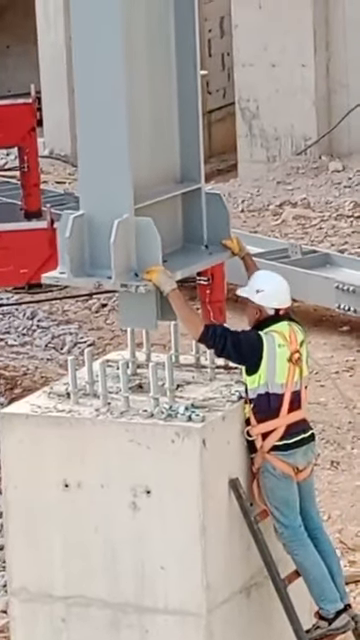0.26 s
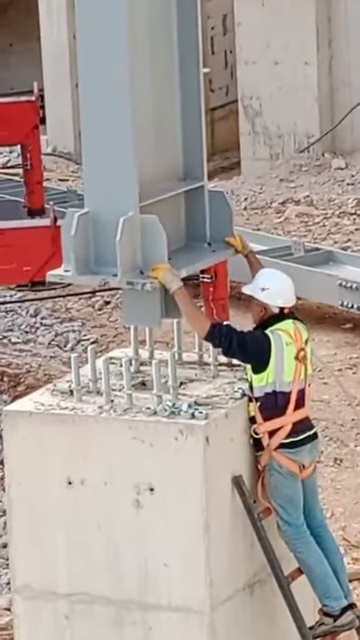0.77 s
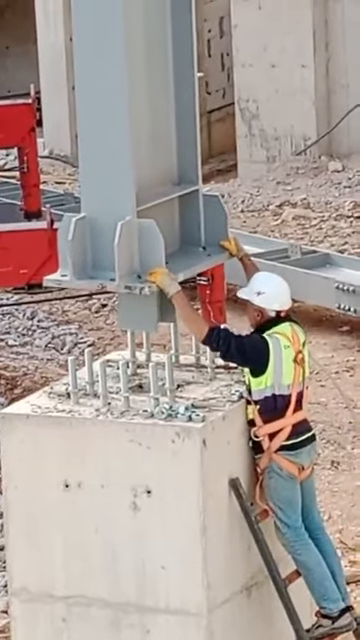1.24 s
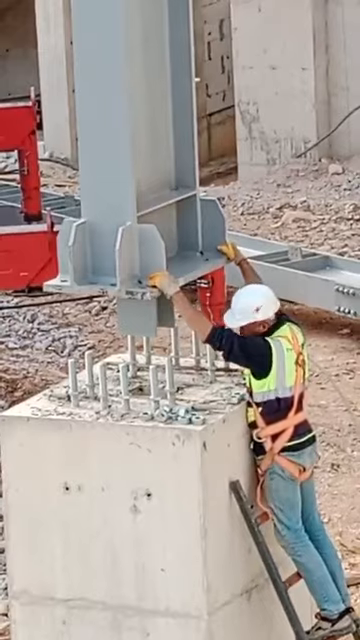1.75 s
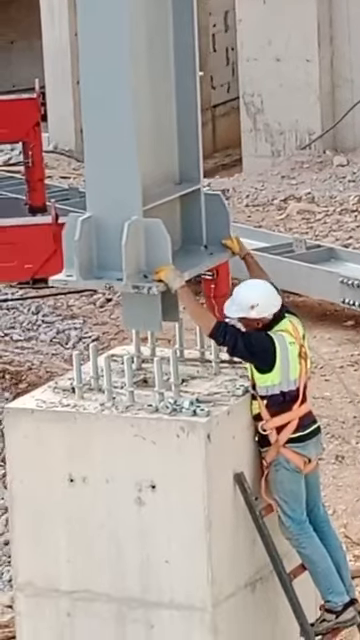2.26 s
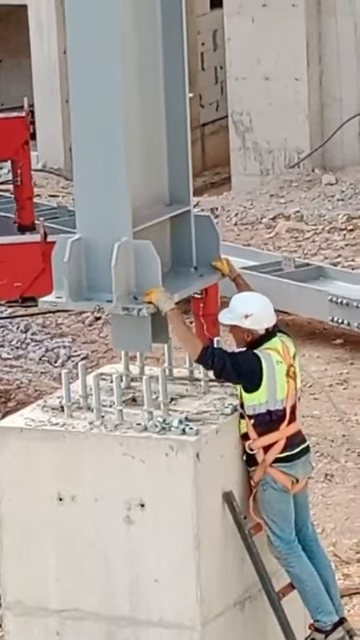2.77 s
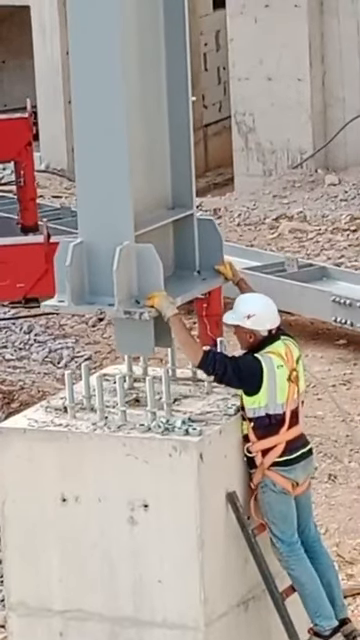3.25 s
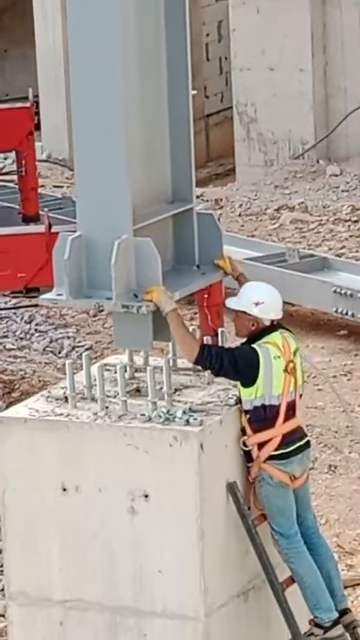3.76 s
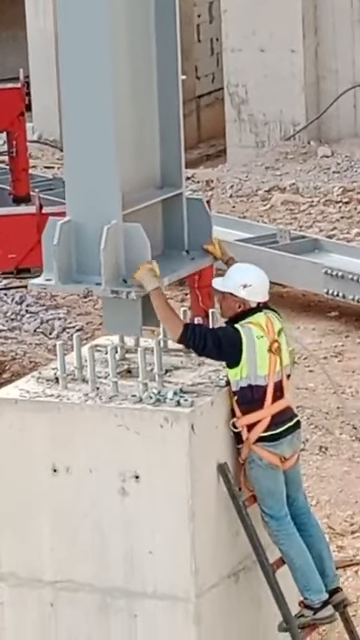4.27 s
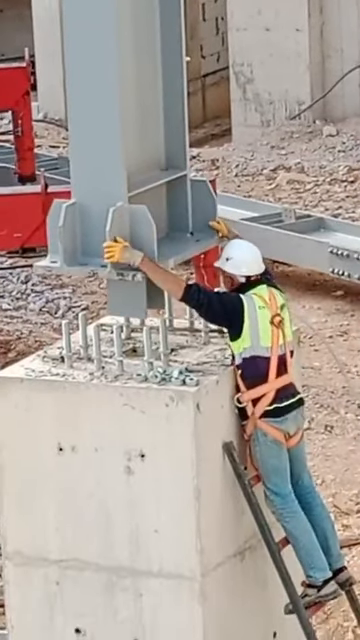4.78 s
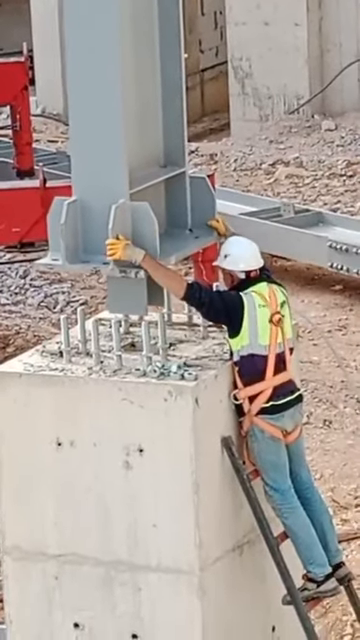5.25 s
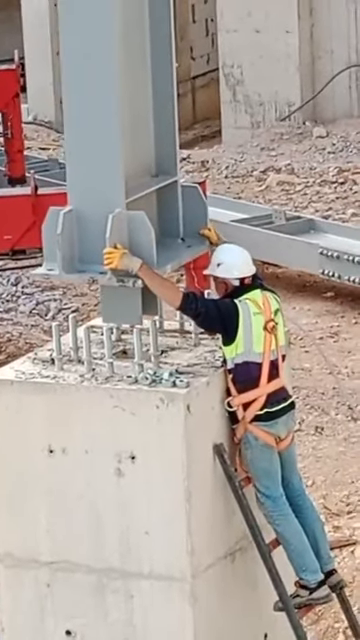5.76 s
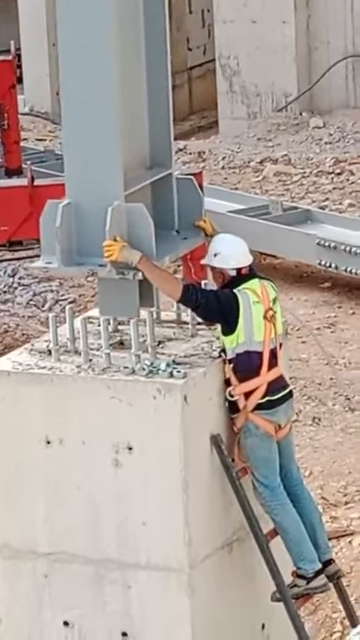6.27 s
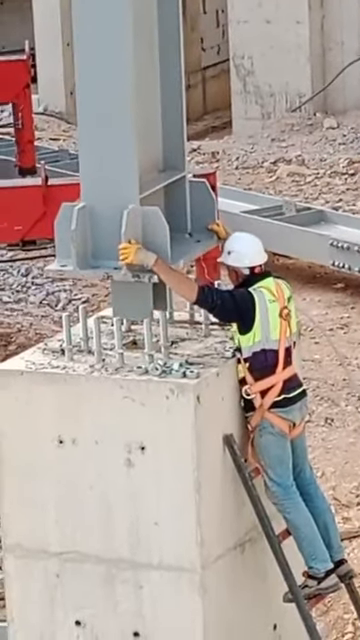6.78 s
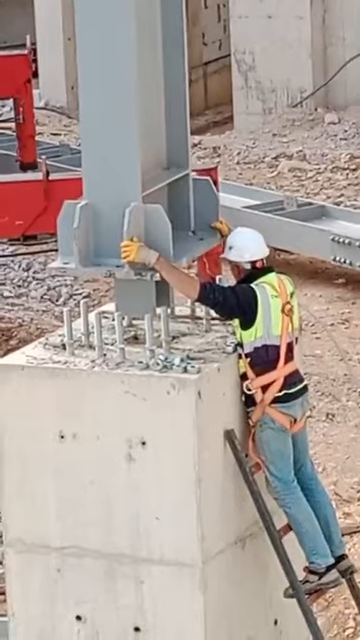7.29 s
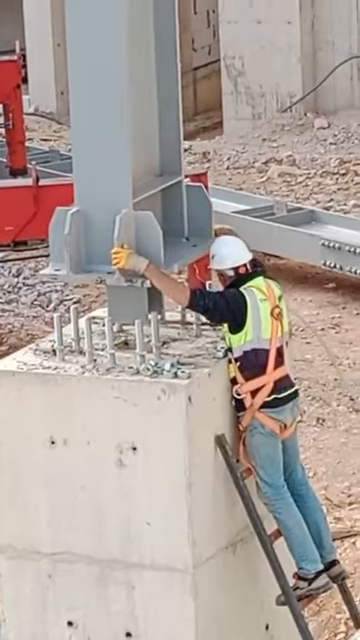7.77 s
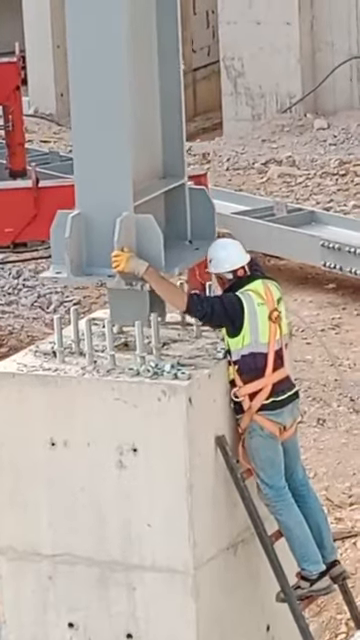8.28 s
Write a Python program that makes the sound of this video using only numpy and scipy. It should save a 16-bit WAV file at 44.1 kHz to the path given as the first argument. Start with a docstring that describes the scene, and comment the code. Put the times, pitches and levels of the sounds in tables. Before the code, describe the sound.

A heavy diesel engine on a building site slows to a clattering idle. Steel scrapes briefly and knocks dully, with one sharp metallic clack. A valve lets off a short hiss of air, then the engine revs up under load, louder and booming, and eases near the end. Concrete walls throw the clatter back, and wind gusts buffet the microphone.

```python
"""Crane diesel setting down a steel column.

The six-cylinder engine slows to idle, a valve lets off air, then it revs up under load and eases.
Firings slap the block and boom in the exhaust pipe; concrete walls throw the clatter back.
Steel knocks, rattles and scrapes, with one sharp clack. Gusts buffet the microphone."""
import sys
import numpy as np
from scipy import signal
from scipy.fft import rfft, irfft
from scipy.io import wavfile

SR = 44100
rng = np.random.default_rng(int(sys.argv[2]) if len(sys.argv) > 2 else 0)


def digitize_waveform(pressure):
    """Quantize a signal to 16-bit integers and store it at the path in sys.argv[1].

    Rows of a 2-D input are taken as channels; values are limited to [-1, 1].
    """
    field = np.atleast_2d(pressure).T
    bounded = np.clip(field, -1, 1)
    quanta = np.round(bounded * 32767).astype(np.int16)
    wavfile.write(sys.argv[1], SR, quanta)


N = 376155
T, HZ = np.arange(N) / SR, np.fft.rfftfreq(N, 1 / SR)

# t/s, firing rate/Hz
FIRING_RATE = [(0, 73), (.1, 70), (.2, 59.5), (.33, 56), (.6, 52), (1.4, 36), (2.0, 29), (2.9, 34.2),
               (3.6, 32.6), (4.15, 38.5), (4.39, 54.5), (4.6, 65), (4.83, 68), (5.5, 64.7), (5.87, 59.3),
               (6.35, 56.5), (7.1, 60.2), (7.6, 58.3), (8.05, 52.5), (8.53, 44)]
# t/s, load/0-1
ENGINE_LOAD = [(1.6, 0), (2.0, .45), (2.7, .47), (3.05, .24), (3.2, .45), (3.7, .47), (4.05, 1), (4.8, 1),
               (5.5, .85), (6.25, .7), (6.7, .92), (7.05, .62), (7.3, .54), (7.6, .68), (8.04, .73),
               (8.14, .45), (8.53, .3)]
CYLINDERS = 6


def diesel(jitter=.002):
    """One crankshaft drives block and exhaust; the clatter echoes off the walls."""
    firings = np.cumsum(curve(FIRING_RATE) * (1 + jitter * drift(8))) / SR
    clatter = colour(walls(block(firings)), TREBLE_CUT)
    return clatter + exhaust_tones(firings) + exhaust_drone(firings) + exhaust_boom(firings)


def speed_octaves(ref_hz=60):
    """Firing rate in octaves above ref_hz."""
    return np.log2(curve(FIRING_RATE) / ref_hz)


def effort_db(base_db=-26.5, db_per_octave=10, db_per_load=12):
    """The engine gets louder with speed and load."""
    return base_db + db_per_octave * speed_octaves() + db_per_load * (curve(ENGINE_LOAD) - 1)


def vibration(firings, roughness, size=4096):
    """Shaking that repeats with each round of the cylinders, blended with noise."""
    pattern = irfft(np.exp(2j * np.pi * rng.random(size // 8)), size)
    repeating = np.interp(firings / CYLINDERS % 1, np.arange(size) / size, pattern, period=1)
    return np.sqrt(1 - roughness) * unit(repeating) + 2 * np.sqrt(roughness) * noise()


# clatter under load: f/Hz, level/dB
LOADED_SPECTRUM = [(300, -22.5), (430, -19.5), (475, -27.5), (540, -28.5), (600, -8.5), (760, -2.5),
                   (818, 0), (960, -1), (1050, 1.5), (1160, -0.5), (1290, 3), (1370, -3), (1490, -15.5),
                   (1650, -9), (1760, -22), (2000, -28), (2400, -12.5), (2880, -17), (3300, -28.5),
                   (4400, -24.5), (5800, -31.5), (8000, -40.5)]
# looser, hissier clatter, running throughout on its own level curve: f/Hz, level/dB
LOOSE_SPECTRUM = [(260, -24.5), (410, -11.5), (480, -19), (550, -10.5), (650, -11), (869, -1.5), (1120, -1),
                  (1460, -7), (1630, -6), (2170, -15), (2890, -13), (4710, -27.5), (5350, -25.5),
                  (5700, -30.5), (7410, -73), (12500, -120)]
# t/s, relative level/dB
LOOSE_LEVEL = [(0, -34.5), (1.3, -35), (2.2, -38.5), (2.45, -39.5), (2.7, -36), (2.82, -44.5),
               (2.94, -46.5), (3.0, -51.5), (3.08, -40), (3.2, -37), (3.8, -43.5), (4.3, -35), (5.0, -37.5),
               (6.0, -37.5), (7.3, -41), (7.8, -37.5), (8.15, -44.5), (8.3, -47), (8.53, -40.5)]


def block(firings, uneven_db=2.6, slap_firings=.35, bright_db_per_octave=10.5, gain_db=2.5):
    """Each firing slaps the block, most distinctly at idle. Load brings out the ring near 1 kHz."""
    cylinder_gain = amp(uneven_db * rng.standard_normal(CYLINDERS))[firings.astype(int) % CYLINDERS]
    slap_depth = .56 * 40 / curve(FIRING_RATE)
    slaps = 1 + slap_depth * cylinder_gain * np.exp(-(firings % 1) / slap_firings)
    drive = vibration(firings, roughness=.81) * slaps * amp(.16 * drift(5))
    wander_db = 1.51 * drift(5)
    bright_db = bright_db_per_octave * speed_octaves() - 1.4
    loaded = brighten(voiced(drive, LOADED_SPECTRUM), bright_db + wander_db, split_hz=1900)
    loose = brighten(voiced(drive, LOOSE_SPECTRUM), 1.5 + wander_db, split_hz=1450)
    return amp(gain_db) * (amp(effort_db()) * loaded + amp(curve(LOOSE_LEVEL)) * loose)


# deep pipe resonance: f/Hz, gain/dB
BOOM_RESPONSE = [(36, -54), (42, -43.5), (48, -25), (58, -26), (67, -35), (80, -50)]
# second firing harmonic: t/s, level/dB
SECOND_HARMONIC = [(0, -49), (.1, -25.5), (.2, -33), (.46, -25), (.58, -32), (.7, -52.5), (4.6, -49),
                   (5.0, -25.5), (5.4, -36.5), (5.9, -34), (6.9, -32), (7.15, -42), (7.45, -43.5),
                   (7.65, -29), (8.0, -33), (8.15, -52)]


def exhaust_boom(firings, db_per_octave=14.5, knee_load=.77, db_per_load=61):
    """The lowest tone sweeps the pipe resonance and collapses off load; its octave wavers above."""
    resonance_db = np.interp(.92 * curve(FIRING_RATE), *np.transpose(BOOM_RESPONSE))
    collapse_db = db_per_load * np.minimum(curve(ENGINE_LOAD) - knee_load, 0)
    boom = amp(resonance_db + db_per_octave * speed_octaves() + collapse_db) * tone(firings, .98)
    return boom + amp(curve(SECOND_HARMONIC) + 2.5 * drift(9)) * tone(firings, 2)


# f/Hz, gain/dB
PIPE_RESPONSE = [(165, -12.5), (205, -11.5), (238, -4), (270, -11), (300, -12), (335, -3.5), (375, -20),
                 (450, -17.5), (520, -35)]


def exhaust_tones(firings, throb_depth=.55, waver_db=2):
    """Firing harmonics 3-7, shaped by the pipe, throb once per crank turn."""
    tones = np.zeros(N)
    for k in range(3, 8):
        pipe_db = np.interp(k * curve(FIRING_RATE), *np.transpose(PIPE_RESPONSE))
        tones += amp(pipe_db + waver_db * drift(9)) * tone(firings, k)
    throb = 1 + throb_depth * np.sin(2 * np.pi * firings / 3)
    return exhaust_gain() * throb * tones


# f/Hz, level/dB
DRONE_SPECTRUM = [(50, -29), (90, 0.5), (130, 2.5), (200, -5), (260, 8.5), (330, -2), (410, -22),
                  (490, -26.5), (800, -43.5)]


def exhaust_drone(firings, extra_db_per_load=6):
    """Crank and cylinder orders drone, growing with speed and load."""
    drone = voiced(vibration(firings, roughness=.15), DRONE_SPECTRUM)
    return exhaust_gain() * amp(-10.5 + extra_db_per_load * (curve(ENGINE_LOAD) - 1)) * drone


def exhaust_gain(extra_db_per_octave=6.5):
    """Tones and drone grow faster with speed than the clatter."""
    return amp(effort_db() + extra_db_per_octave * speed_octaves())


# t/s, level/dB
AIR_LEVEL = [(3.07, -85), (3.085, -52), (3.103, -34.5), (3.14, -35.5), (3.22, -41), (3.38, -47.5),
             (3.55, -59)]
# f/Hz, level/dB
AIR_SPECTRUM = [(1200, -5.5), (2600, 2), (3400, -3), (4200, 0), (5600, -5.5), (6380, -11.5), (6600, -32.5),
                (8200, -20), (10000, -25), (12500, -16), (15500, -28)]
# f/Hz, relative level/dB
NOZZLE_WHISTLES = [(3952, -50), (4748, -52), (4872, -50), (5130, -52), (5190, -52), (5573, -53),
                   (5677, -52)]


def air_valve(reflection=.62, delay_s=.0026, split_hz=7000):
    """A jet, combed by a near reflection, dulls and dies as pressure drops; the nozzle whistles."""
    level_db = curve(AIR_LEVEL)
    drop_db = level_db - level_db.max()
    jet = voiced(noise(), AIR_SPECTRUM)
    jet = unit(jet + reflection * np.interp(T - delay_s, T, jet))
    body = irfft(rfft(jet) / (1 + (HZ / split_hz) ** 20), N)
    hiss = amp(level_db) * (body + (jet - body) * amp(1.5 * drop_db))
    whistles = sum(amp(db) * unit(drift(14) * np.sin(2 * np.pi * hz * T)) for hz, db in NOZZLE_WHISTLES)
    ring = swell(AIR_LEVEL[1][0], length_s=.16, rise_s=.015, fall_s=.25)
    return hiss + amp(2 + .63 * drop_db) * ring * whistles


# t/s, level/dB, f/Hz, t60/s, crack level/dB
BLOWS = [(0.856, -13, 261, 0.043, -28), (1.4549, -2.5, 814, 0.0055, -39), (1.884, -9.5, 700, 0.0032, -26),
         (2.287, -12, 1100, .008, -19), (2.2903, -0.3, 310, .011, -31), (2.2956, -10, 270, 0.013, -35),
         (2.3023, -12, 365, 0.0093, -38), (2.323, -9, 337, 0.013, -33), (2.4042, -6, 362, 0.019, -34),
         (2.5729, -6.5, 389, 0.025, -25), (2.725, -14.5, 355, 0.015, -34), (2.957, -6.5, 205, 0.0098, -56),
         (3.873, -24, 1000, 0.0069, -38), (6.384, -7.5, 315, 0.02, -35), (7.321, -12.5, 330, 0.021, -32),
         (8.26, -8, 620, 0.0086, -43), (8.26, -5.5, 294, 0.016, -46), (8.265, -6.5, 194, 0.046, -72),
         (8.336, -18, 372, 0.031, -51), (8.41, -14.5, 236, 0.067, -47)]
# f/Hz, level/dB
CRACK_SPECTRUM = [(200, -9), (800, 10), (1800, -2), (2400, -4), (3200, -10), (4500, -14.5), (6000, -33)]
# f/Hz, gain/dB
BASS_CUT = [(50, -22), (160, -3)]
# also on clatter, rattles and scrape: f/Hz, gain/dB
TREBLE_CUT = [(5750, -0.5), (6100, -38.5), (6850, -10), (7300, -29), (8100, -18.5), (9000, -37.5),
              (15000, -34.5)]


def knocks():
    """Heavily damped blows: a few swings of one low mode under a short crack."""
    out, t = np.zeros(N), T[:SR // 8]
    crack = voiced(noise(), CRACK_SPECTRUM)
    for start_s, db, hz, t60_s, crack_db in BLOWS:
        age = 9 * t / t60_s
        thud = amp(db) * age * np.exp(1 - age) * np.sin(2 * np.pi * hz * t)
        add(out, start_s, thud + burst(crack, start_s, crack_db, t60_s=.041))
    return colour(out, BASS_CUT + TREBLE_CUT)


# t/s, gain/dB
CLACK_HIT = (2.287, -13.5)
# f/Hz, relative level/dB, t60/s
CLACK_MODES = [(829, -1.5, 0.057), (1710, 0.5, 0.018), (2340, -19, 0.055), (3000, -10, 0.018),
               (3440, -10, 0.022)]


def steel_clack(rise_s=.00057):
    """Steel meets steel and rings briefly; the walls answer."""
    out, t = np.zeros(N), T[:SR // 4]
    start_s, gain_db = CLACK_HIT
    ring = sum(amp(db - 60 * t / t60_s) * np.sin(2 * np.pi * hz * t) for hz, db, t60_s in CLACK_MODES)
    add(out, start_s, amp(gain_db) * ring * (1 - np.exp(-t / rise_s)))
    return walls(out, echo_db=-15)


# t/s, length/s, buffet level/dB, flutter level/dB
RUMBLE_SPANS = [(0, 0.02, -21, -21.5), (0.042, 0.35, -30.5, -31.5), (0.389, 0.099, -25, -26.5),
                (.53, 0.18, -30.5, -29.5), (0.794, 0.26, -29, -29.5), (1.143, 0.28, -32.5, -32.5),
                (1.505, 0.1, -21.5, -29), (1.627, 0.31, -32.5, -30.5), (2.307, 0.19, -33, -31),
                (2.544, 0.26, -56, -30.5), (2.799, 0.065, -22, -35), (2.953, 0.13, -19.5, -36.5),
                (3.239, 0.023, -24, -37), (3.407, 0.23, -28.5, -35.5), (4.122, 1.7, -30.5, -35.5),
                (5.477, 1.58, -30.5, -29.5), (6.297, 0.13, -21.5, -31), (7.345, 0.54, -37.5, -32),
                (7.784, 0.044, -25.5, -24.5), (8.297, 0.16, -47, -31)]
# f/Hz, level/dB
BUFFET_SPECTRUM = [(20, -26.5), (45, -18), (62, -7), (80, 1.5), (130, 2), (190, -0.5), (260, -11),
                   (400, -37.5)]
# f/Hz, level/dB
FLUTTER_SPECTRUM = [(120, -28), (210, 3.5), (290, 2.5), (380, -2.5), (480, -11.5), (560, -15), (700, -8.5),
                    (1000, -18), (2000, -31.5)]


def rumbles(breeze_buffet_db=-38, breeze_flutter_db=-33, lumpy_db=2.5):
    """Low rumbles over a breeze: wind gusts, a short opening thump, and rumble after the knocks."""
    buffet_power, flutter_power = amp([breeze_buffet_db, breeze_flutter_db]) ** 2
    for start_s, length_s, buffet_db, flutter_db in RUMBLE_SPANS:
        envelope = swell(start_s, length_s, rise_s=.011, fall_s=.048)
        buffet_power += (amp(buffet_db) * envelope) ** 2
        flutter_power += (amp(flutter_db) * envelope) ** 2
    buffet = voiced(noise() * amp(lumpy_db * (drift(29) + drift(7.2))), BUFFET_SPECTRUM)
    flutter = voiced(noise() * amp(lumpy_db * drift(25)), FLUTTER_SPECTRUM)
    return buffet * np.sqrt(buffet_power) + flutter * np.sqrt(flutter_power)


# t/s, level/dB, t60/s, tick level/dB
RATTLE_HITS = [(0.855, -25.5, 0.039, -62), (0.886, -23.5, 0.015, -79), (2.241, -29.5, 0.048, -87),
               (2.406, -29, 0.15, -44), (4.726, -26, 0.16, -83), (6.538, -27, 0.022, -66)]
# f/Hz, level/dB
RATTLE_SPECTRUM = [(700, -25), (1500, -1), (2000, -3.5), (2900, 0.5), (4200, -10.5), (5800, -10),
                   (8000, -25)]
# f/Hz, level/dB
TICK_SPECTRUM = [(3000, -7), (5000, -5), (7000, -17), (15000, 11)]


def rattles():
    """Loose metal clacks; a few clacks carry a fine treble tick."""
    clacks, ticks = np.zeros((2, N))
    clack, tick = voiced(noise(), RATTLE_SPECTRUM), voiced(noise(), TICK_SPECTRUM)
    for start_s, db, t60_s, tick_db in RATTLE_HITS:
        add(clacks, start_s, burst(clack, start_s, db, t60_s))
        add(ticks, start_s, burst(tick, start_s, tick_db, t60_s=.04))
    return colour(clacks, TREBLE_CUT) + ticks


# t/s, level/dB
SCRAPE_LEVEL = [(.93, -73), (.955, -44), (.985, -19), (1.005, -26), (1.04, -51), (1.07, -76)]


def scrape(grit_db=1):
    """Steel scrapes briefly in uneven slips."""
    slips = voiced(noise() * amp(grit_db * drift(400)), CRACK_SPECTRUM)
    return colour(slips, TREBLE_CUT) * amp(curve(SCRAPE_LEVEL))


# t/s, length/s, start f/Hz, end f/Hz, level/dB
GLIDES = [(0, 0.13, 273, 269, -31), (0.54, 0.22, 199.5, 252.3, -31), (0.819, 0.36, 250, 291.4, -32),
          (1.64, 0.14, 727, 634, -33), (3.0, 1, 405.6, 408.3, -42), (3.234, 0.087, 3600, 2800, -47),
          (3.291, 0.14, 532, 544, -37.5), (4.399, 0.26, 292, 308, -34.5), (4.999, 0.424, 245.6, 260.6, -33),
          (5.42, 0.24, 505, 490, -38), (5.7, 0.87, 254, 244, -33.5), (8.018, 0.17, 634, 638, -39)]


def gliding_tones(wobble=.03):
    """Short gliding, trembling tones: low engine hums, thin whines and one high squeak."""
    out, tremble = np.zeros(N), 1 + wobble * drift(160)
    for start_s, length_s, start_hz, end_hz, db in GLIDES:
        hz = np.linspace(start_hz, end_hz, round(length_s * SR))
        turns = np.cumsum(hz * tremble[round(start_s * SR):][:len(hz)]) / SR
        glide = np.sin(2 * np.pi * turns) * signal.windows.tukey(len(hz), .5)
        add(out, start_s, amp(db) * unit(glide))
    return out


# t/s, length/s, level/dB
GRIND_SPANS = [(0.4, 0.33, -38.5), (0.935, 0.79, -30.5), (1.79, 0.3, -43), (2.332, 0.504, -36),
               (4.2, 2.75, -39.5), (7.767, 0.041, -36)]
# f/Hz, level/dB
GRIND_SPECTRUM = [(300, -36), (390, 4), (500, 0.5), (620, -7), (800, -5)]


def grind(grit_db=1):
    """Uneven slips ring a low, hollow resonance."""
    level = sum(amp(db) * swell(s, length_s, rise_s=.13, fall_s=.051) for s, length_s, db in GRIND_SPANS)
    return level * voiced(noise() * amp(grit_db * drift(60)), GRIND_SPECTRUM)


def hum(hz=298.3, level_db=-39.5):
    """A faint, wavering machine hum, independent of engine speed."""
    return amp(level_db) * wavering(hz, wobble=.0049, wobble_hz=13.7, waver_db=5, waver_hz=11)


# t/s, level/dB
WHINE_LEVEL = [(5.5, -65), (6.2, -42), (7.3, -46), (7.75, -39), (8.53, -45)]


def whine(hz=644):
    """A thin machine whine that comes up as the engine eases."""
    return amp(curve(WHINE_LEVEL)) * wavering(hz, wobble=.0036, wobble_hz=7.8, waver_db=4.5, waver_hz=17)


# t/s, length/s, level/dB
SIZZLE_SPANS = [(2.5, .3, -85), (3.805, 0.041, -77), (4.55, .25, -84), (7.278, .1, -79), (7.8, .05, -80.5)]


def sizzle(slips_per_s=450, spread_db=4, clump_db=1.5):
    """Steel slides on steel: tiny separate slips in clumps, high in the treble."""
    level = sum(amp(db) * swell(s, length_s, rise_s=.07, fall_s=.1) for s, length_s, db in SIZZLE_SPANS)
    slips = (rng.random(N) < slips_per_s / SR) * amp(spread_db * noise())
    return level * voiced(slips * amp(-clump_db * drift(30)), TICK_SPECTRUM)


def walls(x, echo_db=-9, t60_s=.48, echoes_per_s=600, gap_s=.004):
    """Scattered reflections from concrete and steel."""
    t = T[:SR // 2]
    taps = rng.standard_normal(len(t)) * (rng.random(len(t)) < echoes_per_s / SR)
    taps *= amp(-60 * t / t60_s) * (t > gap_s)
    wet = signal.fftconvolve(x, taps / np.linalg.norm(taps))[:N]
    return (x + amp(echo_db) * wet) / np.hypot(1, amp(echo_db))


def amp(db):
    """Decibels to gain."""
    return 10 ** (np.asarray(db) / 20)


def unit(x):
    """Scales to rms 1."""
    return x / np.sqrt(np.mean(x ** 2) + 1e-20)


def curve(rows):
    """A time table at every sample."""
    return np.interp(T, *np.transpose(rows))


def swell(start_s, length_s, rise_s, fall_s):
    """Rise, hold and fall envelope."""
    end_s = start_s + length_s
    return curve([(start_s - rise_s, 0), (start_s, 1), (end_s, 1), (end_s + fall_s, 0)])


def colour(x, points):
    """Filters by (f/Hz, gain/dB) points."""
    hz, db = np.transpose(points)
    return irfft(rfft(x) * amp(np.interp(np.log(HZ + 1), np.log(hz), db)), N)


def voiced(x, points):
    """Filters with a steep roll-off past the last point, rms 1."""
    return unit(colour(x, list(points) + [(2 * points[-1][0], -100)]))


def brighten(x, db, split_hz):
    """Treble shelf."""
    treble = irfft(rfft(x) / (1 + (split_hz / (HZ + 1)) ** 8), N)
    return x + treble * (amp(db) - 1)


def noise():
    """White noise."""
    return rng.standard_normal(N)


def drift(hz):
    """Random motion up to about hz, rms 1."""
    return unit(irfft(rfft(noise()) * np.exp(-(HZ / hz) ** 2), N))


def tone(firings, multiple):
    """Sine at a multiple of the firing rate, random phase, rms 1."""
    return np.sqrt(2) * np.sin(2 * np.pi * (multiple * firings + rng.random()))


def wavering(hz, wobble, wobble_hz, waver_db, waver_hz):
    """Sine with wobbling pitch and wavering level, rms 1."""
    turns = np.cumsum(hz * (1 + wobble * drift(wobble_hz))) / SR
    return unit(np.sin(2 * np.pi * turns) * amp(waver_db * drift(waver_hz)))


def burst(source, start_s, db, t60_s):
    """A slice of noise that starts at once and decays."""
    t = T[:SR // 8]
    return amp(db - 60 * t / t60_s) * source.take(round(start_s * SR) + np.arange(len(t)), mode="wrap")


def add(mix, start_s, sound):
    """Mixes a sound in at start_s."""
    part = mix[round(start_s * SR):][:len(sound)]
    part += sound[:len(part)]


def scene(hiss_db=-92):
    """Machine, rumbles, steel and air over a very faint hiss, mono."""
    mix = diesel() + hum() + whine() + rumbles()
    mix += knocks() + steel_clack() + rattles() + scrape() + gliding_tones() + grind() + sizzle()
    return (mix + air_valve() + amp(hiss_db) * noise())[None]


def record(dry, cutoff_hz=15700):
    """Steep low-pass."""
    lowpass = signal.firwin(511, cutoff_hz, window=("kaiser", 9), fs=SR)
    return signal.oaconvolve(dry, lowpass[None], "same")


dry = scene()
out = record(dry)
digitize_waveform(out)
```